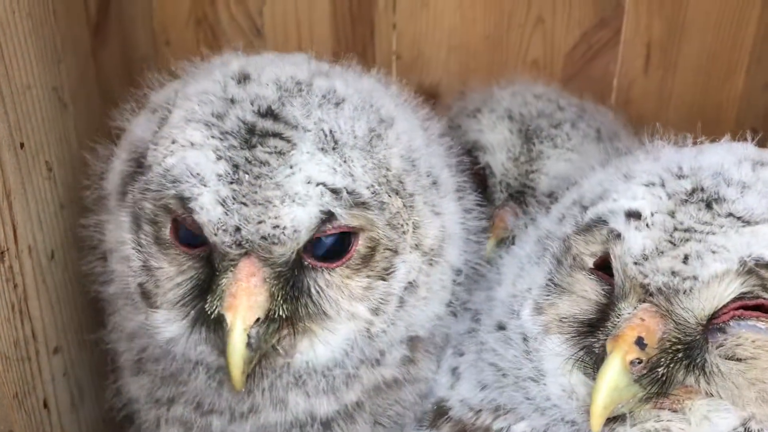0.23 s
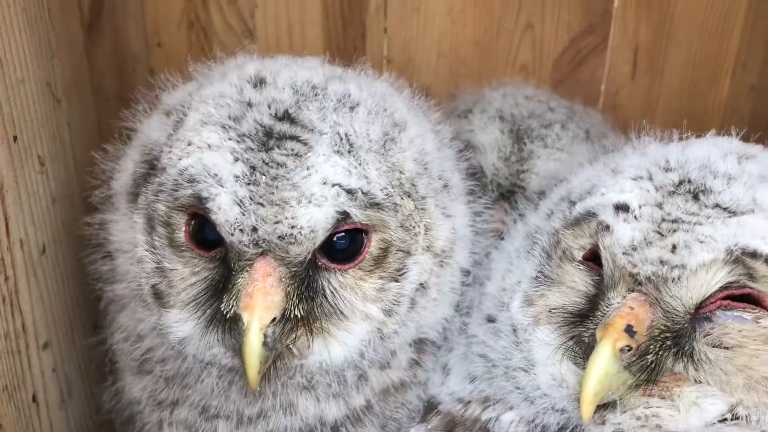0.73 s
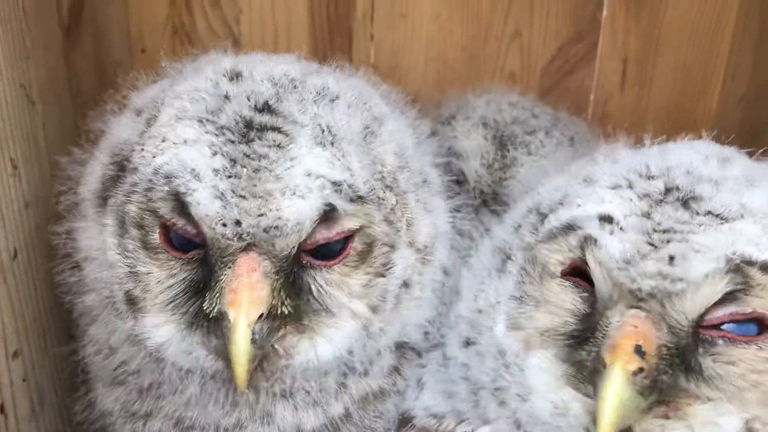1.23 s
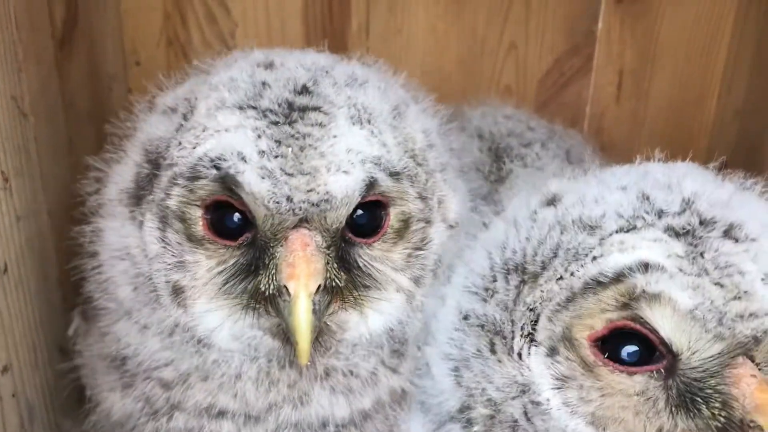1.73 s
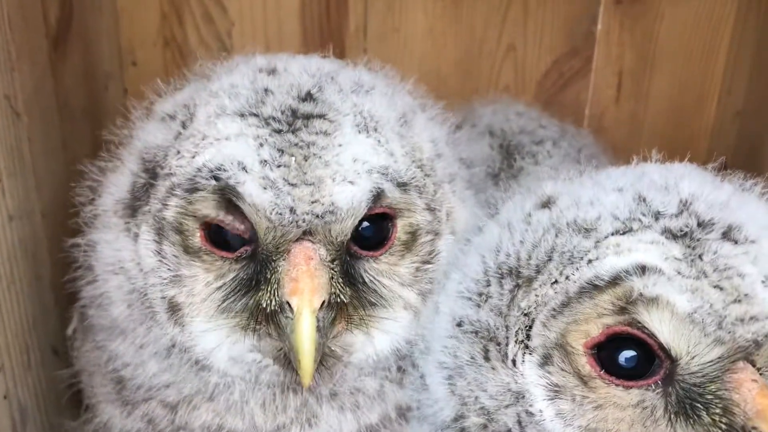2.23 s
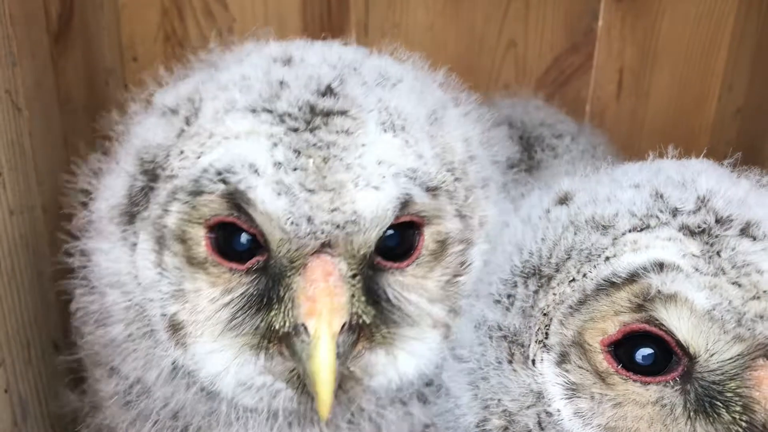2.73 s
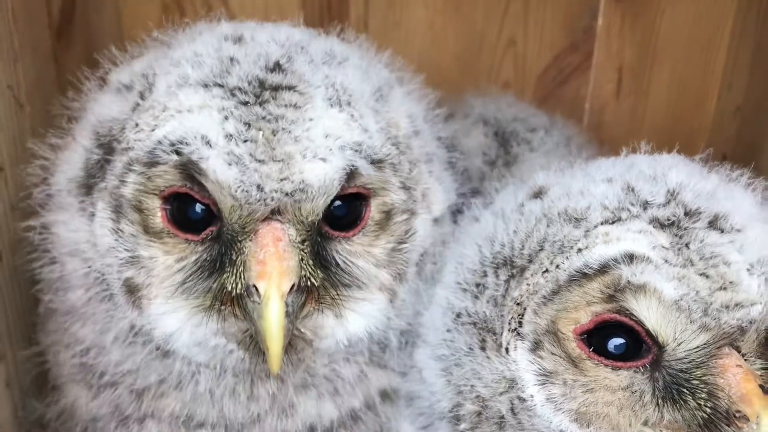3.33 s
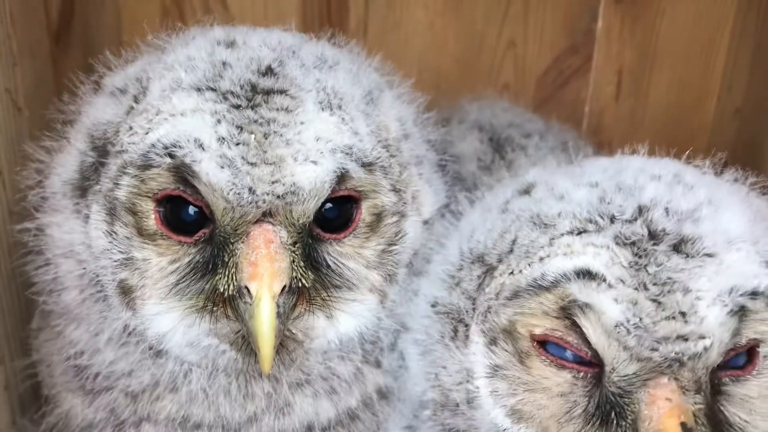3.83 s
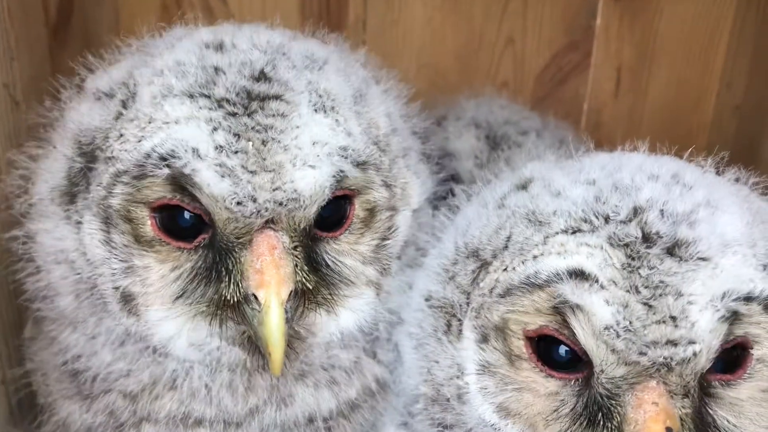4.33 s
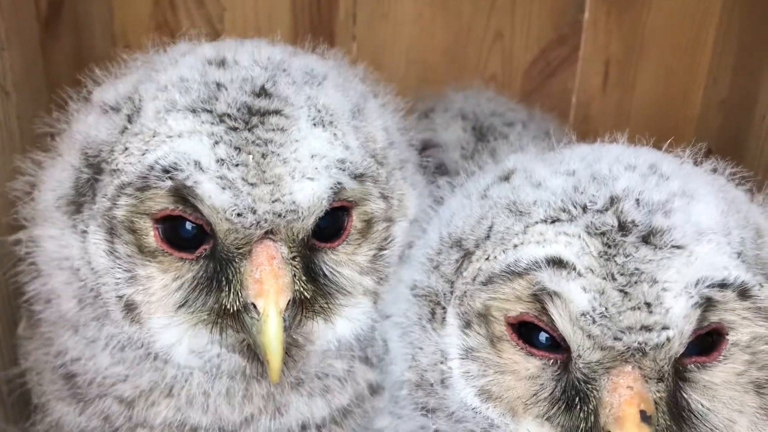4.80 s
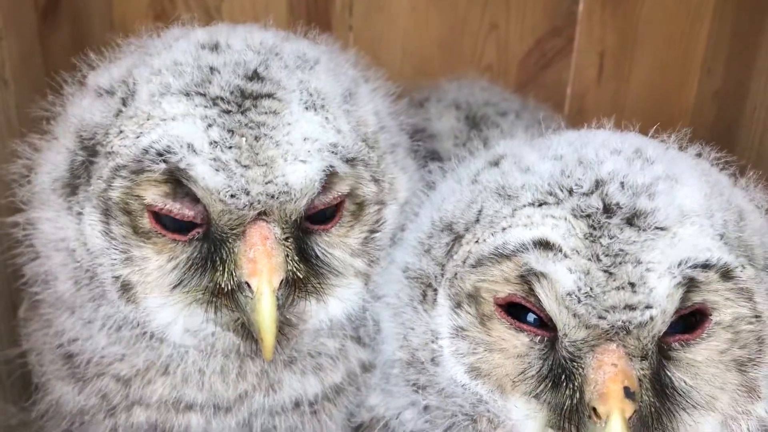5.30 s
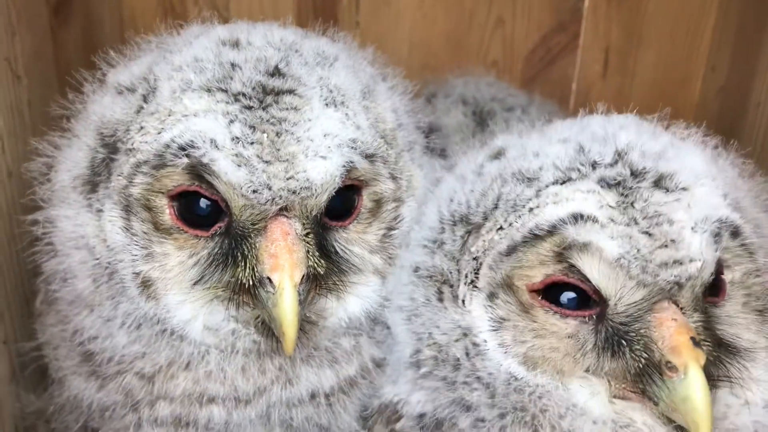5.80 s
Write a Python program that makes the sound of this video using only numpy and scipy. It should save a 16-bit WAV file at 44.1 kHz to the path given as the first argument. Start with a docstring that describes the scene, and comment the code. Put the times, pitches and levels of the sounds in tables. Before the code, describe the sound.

A near owlet begs with thin, hissing double-toned whistles that jump upward, hold, swell and drop into a quick squeak. There are only two full peeps, widely spaced, after a cut-off one at the start; a second chick wheezes faintly behind at the end. Between them are muffled wooden bumps, tiny claw ticks, a faint distant bird, outdoor air and a low idling engine. Close phone microphone, short boxy echo.

```python
"""Wheezy peeps sweep up, hold and drop: owl chicks beg in a wooden nest box, close to a phone.
Each peep is two gliding whistles, one per side of the syrinx (the voice organ), over hissing air.
Another chick answers from behind. The box echoes briefly and takes soft bumps and scratchy ticks.
Far off, an engine idles, thin tones whine, a bird whistles faintly and outdoor air washes by."""
import sys
import numpy as np
from scipy import signal
from scipy.fft import irfft, next_fast_len
from scipy.io import wavfile
from scipy.ndimage import uniform_filter1d

SR = 44100
rng = np.random.default_rng(int(sys.argv[2]) if len(sys.argv) > 2 else 0)


def transcribe(signal):
    """Save signal, clipped to [-1, 1], as a 16-bit WAV file at the path in sys.argv[1]."""
    frames = np.atleast_2d(signal).T
    limited = np.clip(frames, -1, 1)
    pcm = np.round(limited * 32767).astype(np.int16)
    wavfile.write(sys.argv[1], SR, pcm)


N = 267069
TIME = np.arange(N) / SR  # s
FFT_SIZE = next_fast_len(N, real=True)

# air through the back chick: (time [s], relative hiss level [dB], relative chest ring level [dB])
BACK_BREATH = [(5.634, -34, -76), (5.7, -36.5, -61), (5.77, -50, -89), (5.79, -53.5, -67),
               (5.811, -47.5, -69), (5.85, -54, -63), (5.9, -47, -64.5), (5.933, -57, -49.5),
               (5.95, -72, -76)]
# soft knocks on the box, levels relative:
# (time [s], swing peak [dB], swing rate [Hz], panel knock [dB], low shudder [dB])
BOX_BUMPS = [(0.453, -49.5, 102, -67, -56.5), (0.506, -45.5, 100.6, -72, -53.5),
             (0.776, -50.5, 107, -73, -57.5), (0.898, -55, 106, -74, -55), (1.046, -49, 102.3, -69.5, -54),
             (1.127, -38.5, 102, -64, -52.5), (1.25, -46.5, 133, -65.5, -68.5),
             (2.753, -32, 101.6, -45.5, -50.5), (2.857, -42.5, 95, -71, -59),
             (3.001, -46, 156, -57.5, -55.5), (4.249, -47.5, 129.5, -72, -69),
             (4.332, -56, 102.9, -71, -53), (4.462, -43, 140, -65, -55), (4.701, -39, 143, -66, -53),
             (5.663, -49, 102.2, -72, -56), (5.941, -62, 101, -69, -48.5)]


def undb(db):
    """Turn decibels into a plain gain."""
    return 10 ** (np.asarray(db) / 20)


def walk(rate, count=N):
    """Smoothly wandering random values, about `rate` new ones a second, spread near 1."""
    hold = int(SR / rate)
    steps = np.repeat(rng.standard_normal(count // hold + 1), hold)
    smooth = uniform_filter1d(uniform_filter1d(steps, hold), hold)
    return 1.3 * smooth[:count]


def noise(gain):
    """Random noise of rms 1, its colour set by a gain for each frequency."""
    hz = np.fft.rfftfreq(FFT_SIZE, 1 / SR) + 1e-3  # just above 0, so logs and divisions work
    random_phase = np.exp(2j * np.pi * rng.random(len(hz)))
    x = irfft(random_phase * gain(hz), FFT_SIZE)[:N]
    return x / x.std()


def colour(table):
    """Gain over frequency, drawn through (frequency [Hz], level [dB]) points."""
    hz, db = np.transpose(table)
    return lambda f: undb(np.interp(np.log(f), np.log(hz), db))


def resonance(hz, width_hz):
    """Gain of a hollow or plate that favours one pitch, applied twice."""
    return lambda f: 1 / (1 + ((f - hz * hz / f) / width_hz) ** 2)


def fade(start, end, edge, t=TIME):
    """1 between start and end, ramped to 0 over `edge` seconds outside."""
    return np.clip(np.minimum(t - start, end - t) / edge + 1, 0, 1)


def whistle(strands, octave_db, waver, flutter_db):
    """Near-sine whistles with a weak octave; pitch and level tremble."""
    out = np.zeros(N)
    for strand in strands:
        s, hz, db = np.transpose(strand)
        i = np.flatnonzero((TIME >= s[0] - .003) & (TIME < s[-1] + .003))
        t = TIME[i]
        tremble = walk(700, count=SR)[:len(i)]
        flutter = walk(250, count=SR)[:len(i)]
        pitch = np.interp(t, s, hz) * (1 + waver * tremble)
        phase = 2 * np.pi * np.cumsum(pitch) / SR
        level = undb(np.interp(t, s, db) + flutter_db * flutter)
        gain = np.sqrt(2) * level * fade(s[0], s[-1], .003, t)
        out[i] += gain * (np.sin(phase) + undb(octave_db) * np.sin(2 * phase))
    return out


def trailing(lead, part_s, lag_s, above_hz, up_db, parted_db, ring_hz, flare_db):
    """The second side of the syrinx copies the lead a moment late, then parts from it upward."""
    parting_s, upsweep_s = .028, .022
    cut_db_per_s = 3000
    s, hz, _ = np.transpose(lead)
    t = np.arange(s[0] + lag_s, s[-1] + lag_s, .001)
    pitch = np.interp(t - lag_s, s, hz) + above_hz * np.clip((t - part_s) / parting_s, 0, 1)
    # the whistle flares as it crosses the throat's own ring, 750 Hz wide
    ring = np.exp(-((pitch - ring_hz) / 750) ** 2)
    upsweep = up_db + 10.5 * ring - cut_db_per_s * np.maximum(t - t[0] - upsweep_s, 0)
    parted = parted_db + flare_db * ring - cut_db_per_s * np.maximum(t - t[-1] + .006, 0)
    return np.c_[t, pitch, np.where(t > part_s, parted, upsweep)]


def both_sides():
    """Each peep as a pair of whistle curves, because both sides of the syrinx sound at once."""
    # leading side, one curve per peep; the first is already ending, the last is the back chick:
    # (time [s], pitch [Hz], level [dB])
    leads = [
        [(0.0, 7760, -35.5), (0.015, 7700, -25), (0.022, 7350, -33), (0.027, 6450, -24.5), (0.031, 6100, -39),
         (0.037, 5300, -65.5)],
        [(2.012, 3310, -44), (2.024, 5552, -37.5), (2.034, 7540, -35), (2.046, 8500, -38), (2.064, 8820, -39),
         (2.11, 8650, -39), (2.134, 8381, -33), (2.2, 7800, -29.5), (2.256, 7660, -30), (2.276, 7200, -26.5),
         (2.284, 6200, -28), (2.29, 5850, -45), (2.301, 4500, -67.5)],
        [(5.468, 3700, -44), (5.474, 3956, -23.5), (5.484, 6720, -24.5), (5.494, 8447, -31.5),
         (5.52, 9430, -42), (5.568, 9520, -44.5), (5.586, 8946, -27.5), (5.604, 8520, -28.5),
         (5.632, 7944, -33.5), (5.726, 7930, -32), (5.741, 7500, -34), (5.749, 6900, -21), (5.758, 5900, -27),
         (5.766, 5030, -62)],
        [(5.775, 6940, -54), (5.804, 7040, -48), (5.874, 6932, -48), (5.906, 6700, -45), (5.914, 6164, -45.5),
         (5.924, 5250, -36), (5.934, 4140, -46.5), (5.94, 3900, -65)],
    ]
    # trailing side, one row per peep: (parts from the lead at [s], lag [s], sits higher by [Hz],
    # upsweep level before flare [dB], parted level before flare [dB], throat ring [Hz], parted flare [dB])
    followers = [(0.0, .005, 393, -81, -48, 6800, 22), (2.124, .003, 531.6, -33, -44.5, 6640, 24),
                 (5.604, .005, 612, -35, -41.5, 6760, 20), (5.74, .002, 340, -90, -51, 5730, 13)]
    return [[lead, trailing(lead, *row)] for lead, row in zip(leads, followers)]


def low_voice():
    """Rough low strands under the held part, and the sliding squeak that closes each peep."""
    # strands: (start [s], end [s], start pitch [Hz], end pitch [Hz], start level [dB], end level [dB])
    undertones = [(0.0, 0.027, 4700, 4615, -37.5, -36), (2.088, 2.268, 5353, 4690, -53.5, -31.5)]
    # closing squeaks: (time of the peak [s], pitch at the peak [Hz], level at the peak [dB])
    closers = [(0.035, 4204, -30), (2.295, 4124, -26.5), (5.765, 3965, -33), (5.941, 2700, -56.5)]
    strands = []
    u = np.linspace(0, 1, 12)
    for start, end, hz0, hz1, db0, db1 in undertones:
        pitch = hz1 + (hz0 - hz1) * (1 - u) ** 2.2
        level = db1 + (db0 - db1) * (1 - u) ** 2
        strands.append(np.c_[start + (end - start) * u, pitch, level])

    t = np.arange(-.013, .032, .001)  # seconds from the squeak's peak
    squeak_s = .011
    droop_db = -8.5 * (t / squeak_s) ** 4
    after_db = -28.5 - 900 * np.abs(t - squeak_s)
    glide = 1 - 7.5 * np.minimum(t, squeak_s)  # pitch slides down, then stays
    for s, hz, db in closers:
        strands.append(np.c_[s + t, hz * glide, db + np.maximum(droop_db, after_db)])
    return strands


def near_voice():
    """The near chick's paired whistles, with the undertones and all the closing squeaks."""
    pairs = sum(both_sides()[:-1], [])
    return whistle(pairs, -33, .006, 2.5) + whistle(low_voice(), -45, .01, 2)


def catches():
    """The hiss breaks for an instant: a gain with short, smooth dips."""
    catch_times, depth_db, width_s = [5.61, 5.629, 5.86], 19.5, .0057  # times in s
    dips = sum(np.exp(-((TIME - s) / width_s) ** 2) for s in catch_times)
    return undb(-depth_db * dips)


def wheeze():
    """Rushing air makes a broad, sputtering hiss; beak and chest ring at their own pitches."""
    # near chick, levels relative: (start [s], full flow from [s], end [s], hiss [dB], beak ring [dB])
    breaths = [(-0.26, -0.1, 0.03, -49, -36), (2.012, 2.143, 2.275, -46.5, -34),
               (5.469, 5.661, 5.765, -46.5, -33.5)]
    # hiss colour: (frequency [Hz], relative level [dB])
    hiss_colour = [(1350, -36.5), (2350, -22), (2750, -5), (3500, -1.5), (4300, 3.5), (5500, -1), (7100, 1),
                   (7600, -9.5), (9300, -25.5), (10400, -47.5), (11600, -16.5), (13400, -38),
                   (14800, -23.5), (16000, -31)]
    # rings of the beak, then of the chest: (frequency [Hz], width [Hz], relative level [dB])
    beak_rings = [(6287, 340, 0), (6760, 380, -2), (5120, 610, -6)]
    chest_rings = [(631, 78, -10.5), (950, 250, 0), (1613, 470, 3), (2360, 460, -1)]
    release_db_per_s, flare_s = 1098.5, .0082
    hiss_gain, beak_gain, chest_gain = 0, 0, 0
    for start, full, end, db, beak_db in breaths:
        opening = (TIME > start) * np.minimum((TIME - start) / .018, 1)
        gate = opening * undb(-release_db_per_s * np.clip(TIME - end, 0, .1))
        # a puff opens the peep, the flow slackens, swells to full and gets a last push
        moments = [start, start + .067, full, end - .045, end]
        flow = gate * undb(db + np.interp(TIME, moments, [3.5, -12, 0, 0, 6]))
        flare = np.exp(-((TIME - start - flare_s) / flare_s) ** 2)
        hiss_gain = hiss_gain + flow
        chest_gain = chest_gain + flow * undb(-12 + 11.5 * flare)
        beak_gain = beak_gain + gate * undb(beak_db + 8.5 * flare)

    # the back chick's breath rings the same chest tones
    s, _, back_db = np.transpose(BACK_BREATH)
    chest_gain = chest_gain + fade(s[0], s[-1], .003) * undb(np.interp(TIME, s, back_db))

    sputter = undb(2.0 * walk(300))
    beak = sum(undb(db + 2.5 * walk(300)) * noise(resonance(hz, w)) for hz, w, db in beak_rings)
    chest = sum(undb(db + 3.2 * walk(60)) * noise(resonance(hz, w)) for hz, w, db in chest_rings)
    broad = undb(8.5) * noise(colour(hiss_colour))
    breath = sputter * (hiss_gain * broad + undb(-9) * chest_gain * chest)
    return catches() * (breath + undb(-4.5) * beak_gain * beak)


def back_wheeze():
    """The chick behind hisses thinner and higher: coloured noise in quick spurts."""
    # hiss colour: (frequency [Hz], relative level [dB])
    thin_colour = [(2500, -23), (3500, -10), (4900, -3.5), (6000, -6), (8600, 5), (9800, -13.5),
                   (10500, -24), (16000, -30)]
    s, db, _ = np.transpose(BACK_BREATH)
    spurts = undb(np.interp(TIME, s, db) + 2.5 * walk(220))
    return catches() * fade(s[0], s[-1], .003) * spurts * noise(colour(thin_colour))


def back_chick():
    """The chick behind: paired whistles, breathy wavering strands and its own hiss."""
    # breathy strands, high, middle and low: (time [s], pitch [Hz], level [dB])
    hoarse = [
        [(5.79, 8800, -68), (5.85, 8700, -59), (5.892, 9050, -47.5), (5.904, 8300, -46), (5.922, 6800, -69)],
        [(5.792, 5050, -63), (5.806, 5000, -57), (5.84, 4900, -65)],
        [(5.78, 597, -71), (5.86, 595.4, -78), (5.885, 622, -66.5), (5.915, 660, -66.5), (5.94, 866, -64.5)],
    ]
    pair = both_sides()[-1]
    return whistle(pair, -27, .007, 2.5) + whistle(hoarse, -40, .018, 6) + back_wheeze()


def ticks():
    """Claw or straw ticks: brief scratchy noise bursts with a little ring."""
    # (time [s], relative peak level [dB], length [s])
    tick_list = [(0.636, -50.5, 0.011), (0.689, -58.5, 0.0094), (1.356, -61, 0.0072), (2.7524, -52, 0.0044)]
    scratch = noise(resonance(1470, 2800)) + 0.67 * noise(resonance(5900, 1220))
    scratch = scratch + 0.49 * rng.standard_normal(N)
    bursts = sum(undb(db - 6.5) * (TIME > s) * np.exp(-np.abs(TIME - s) / length)
                 for s, db, length in tick_list)
    return scratch * bursts


def box(x):
    """The wooden walls add a short dense echo: fading noise convolved with the sound."""
    t60_s, echo_db = .083, -20.5  # time to fade by 60 dB, echo level
    t = TIME[:SR // 5]
    tail = rng.standard_normal(len(t)) * undb(-60 * t / t60_s)
    return x + undb(echo_db) * signal.fftconvolve(x, tail / np.linalg.norm(tail))[:N]


def bumps():
    """Each bump is one soft swing of the wall plus the fading tones of the panel it knocks."""
    # panel tones: (frequency [Hz], level against the knock [dB], time to fade by 60 dB [s])
    panel = [(153.5, 16, 0.034), (249.5, 5.5, 0.05), (346, 10, 0.043), (646, -4, 0.075)]
    out, t = np.zeros(N + SR), TIME[:SR // 8]
    for s, db, hz, knock_db, _ in BOX_BUMPS:
        turns = (t - .011) * hz  # the swing peaks a moment after first contact
        swing = undb(db + 1.5) * np.exp(-(turns / 0.59) ** 2) * np.sin(-2 * np.pi * turns)
        ring = sum(undb(knock_db + g - 60 * t / t60) * np.sin(2 * np.pi * f * t) for f, g, t60 in panel)
        soft_start = 1 - np.exp(-(t / .0043) ** 2)
        out[int(s * SR):][:len(t)] += swing + ring * soft_start
    return out[:N]


def rumble():
    """Low buffeting on the microphone: nearly calm noise, swelling at gusts and after bumps."""
    # (time [s], relative level [dB])
    gusts = [(0.0, -53), (0.32, -62), (2.61, -61.5), (3.28, -59), (4.64, -55.5), (5.07, -58.5), (5.85, -58)]
    swells = gusts + [(row[0] + .013, row[4]) for row in BOX_BUMPS]
    slope_db_per_s = 177.5  # rise and fall around each swell
    curves = [peak - slope_db_per_s * np.abs(TIME - s) for s, peak in swells]
    calm = -73.5 + 4.0 * walk(6)
    db = np.max(curves + [calm], axis=0)  # the loudest one wins
    return undb(4.5 + db + 3.3 * walk(28)) * noise(resonance(50, 55))


def engine():
    """A far engine idles: its firing tone and the octave above, slightly unsteady."""
    # (time [s], firing rate [Hz], level [dB], octave level [dB])
    idle = [(0, 63, -45.5, -69), (.6, 62.64, -46.5, -69), (1.1, 64, -52, -74), (1.4, 61.5, -46, -64.5),
            (1.9, 61.5, -45, -59), (2.7, 61.57, -46, -62), (3.4, 61.83, -45, -61.5),
            (3.9, 61.5, -44.5, -61.5), (4.5, 60.04, -49, -62.5), (5.0, 60.3, -44.5, -61),
            (5.6, 59.46, -45.5, -61.5), (5.75, 58.14, -52.5, -64), (6.05, 58.3, -49, -58.5)]
    s, *columns = np.transpose(idle)
    hz, db, octave_db = (np.interp(TIME, s, column) for column in columns)
    phase = 2 * np.pi * np.cumsum(hz * (1 + 0.0011 * walk(6))) / SR
    tone = undb(db + 0.41 * walk(7.8)) * np.sin(phase)
    octave = undb(octave_db + 1.5 * walk(9)) * np.sin(2 * phase)
    return np.sqrt(2) * (tone + octave)


def whines():
    """Thin sine tones that come and go, their level wandering slowly."""
    # (start [s], end [s], pitch [Hz], peak level [dB])
    tones = [(2.93, 5.9, 955, -78), (1.25, 1.684, 425, -78), (1.1, 3.2, 13600, -87.5)]
    return sum(undb(db + 2.507 * walk(1.8)) * fade(start, end, 0.12) * np.sin(2 * np.pi * hz * TIME)
               for start, end, hz, db in tones)


def far_bird():
    """Faint thin whistles far off: trembling, near-pure tones."""
    # one curve per whistle: (time [s], pitch [Hz], level [dB])
    calls = [
        [(2.4, 3610, -89), (2.95, 3620, -88.5), (3.07, 3780, -82.5), (3.2, 3820, -85.5)],
        [(3.82, 3950, -92.5), (3.96, 4180, -81), (4.3, 4240, -89)],
        [(4.45, 4150, -84.5), (4.65, 4300, -84), (4.8, 4320, -93)],
    ]
    return whistle(calls, -40, .008, 4.0)


def air():
    """Distant outdoor wash: octave bands of noise swell together and flicker alone."""
    # (frequency [Hz], relative level [dB])
    air_colour = [(20, -34), (45, -24.5), (90, -19), (140, -24), (180, -30.5), (400, -32.5), (714, -38),
                  (962, -37), (1400, -43), (1800, -41.5), (2760, -43.5), (4200, -46.5), (5000, -52),
                  (5800, -50.5), (10500, -56), (14800, -51.5), (16000, -56)]
    out, swell, shape = 0, walk(1.0), colour(air_colour)
    for hz in 30 * 2 ** np.arange(10):
        band = lambda f: shape(f) * np.clip(1 - np.abs(np.log2(f / hz)), 0, 1) ** .5
        share = np.linalg.norm(band(np.arange(1., SR / 2)))
        out = out + share * undb(0.5 * swell + 0.91 * walk(5)) * noise(band)
    # the -68 dB level counts from 200 Hz up
    return undb(-68) * out / np.linalg.norm(shape(np.arange(200., SR / 2)))


def scene():
    """Chicks and ticks echo in the box; bumps, rumble and the far sounds are added without echo."""
    inside = box(near_voice() + back_chick() + wheeze() + ticks())
    far = engine() + whines() + far_bird() + air()
    return (inside + bumps() + rumble() + far)[None]


def record(dry):
    """The phone cuts the top: a steep low-pass filter at 15800 Hz."""
    return signal.sosfilt(signal.ellip(12, .2, 80, 15800, fs=SR, output="sos"), dry)


dry = scene()
out = record(dry)
transcribe(out)
```